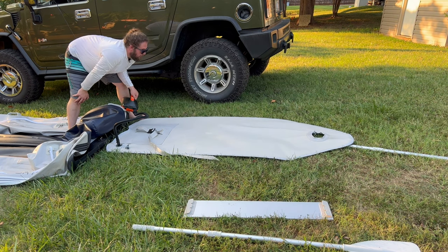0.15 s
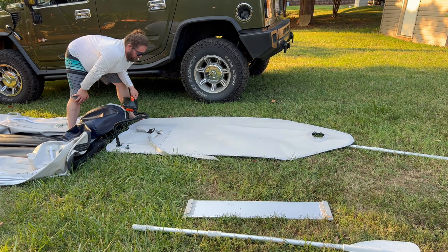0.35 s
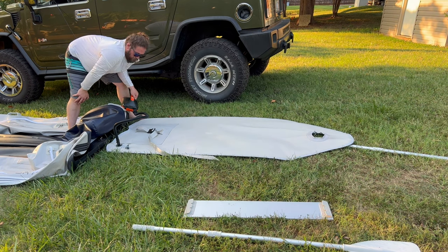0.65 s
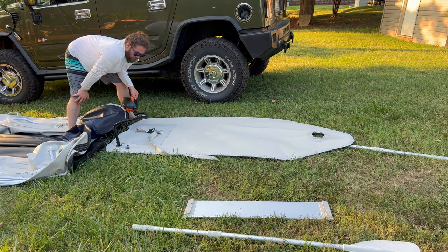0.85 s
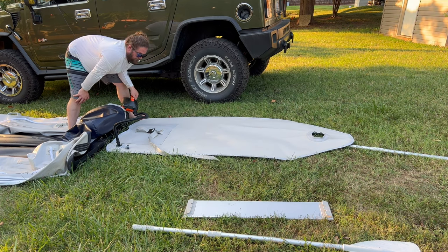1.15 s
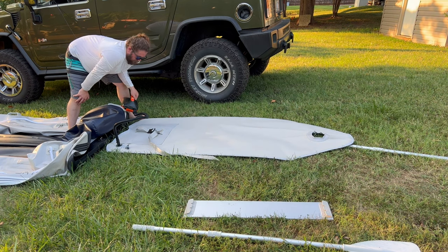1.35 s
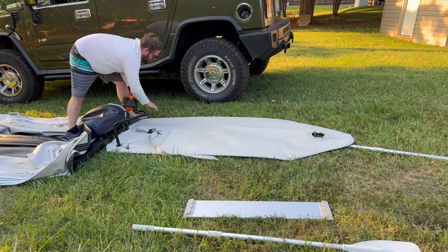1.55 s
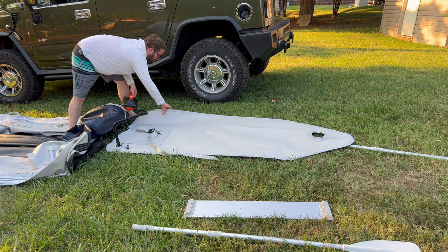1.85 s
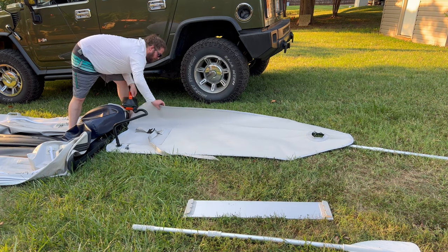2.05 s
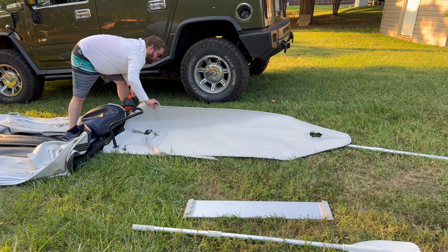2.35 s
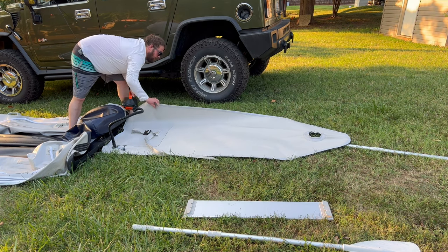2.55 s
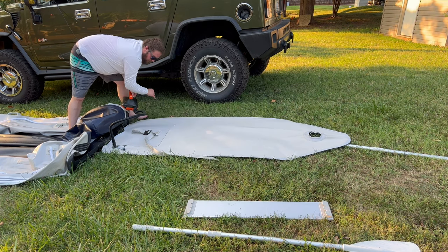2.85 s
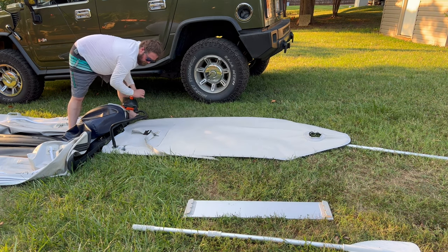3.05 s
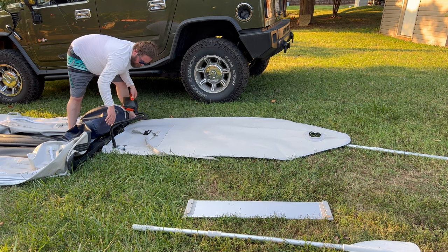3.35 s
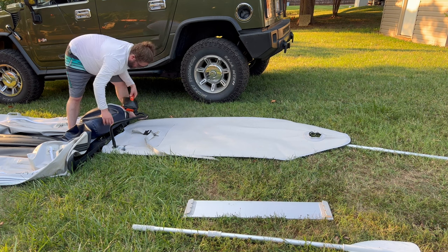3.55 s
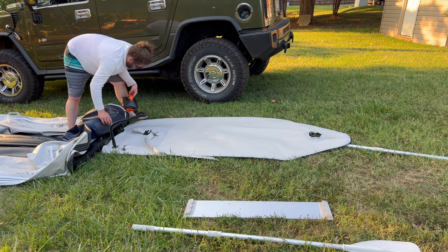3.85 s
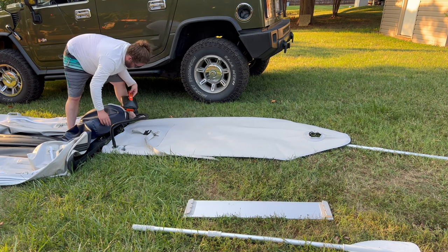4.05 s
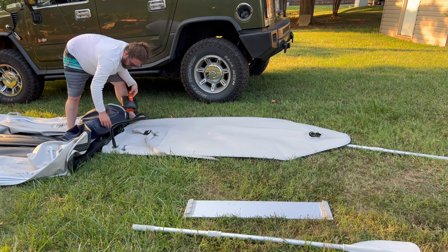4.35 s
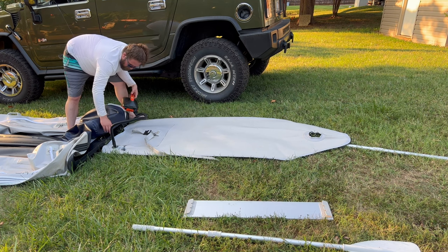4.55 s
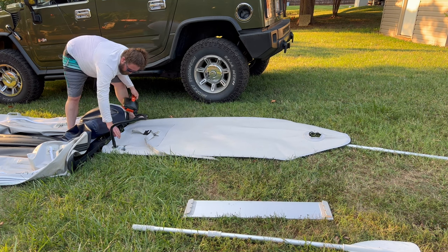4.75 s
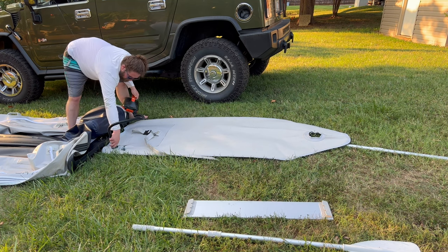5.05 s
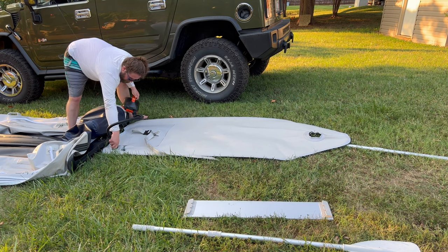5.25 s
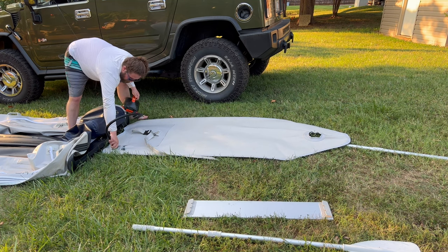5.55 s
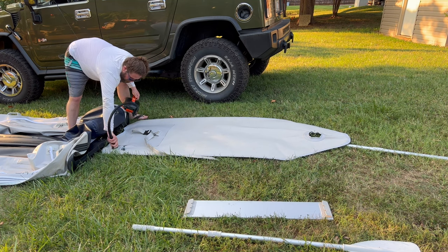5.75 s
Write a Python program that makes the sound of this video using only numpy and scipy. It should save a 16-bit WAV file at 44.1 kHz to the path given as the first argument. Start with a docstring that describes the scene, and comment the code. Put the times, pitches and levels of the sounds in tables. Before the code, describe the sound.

Steady mid-pitched pump whirr with breathy suction, a pop and brighter hiss, then a switch click and a falling, fading whine.

```python
"""On a lawn outdoors, a few metres away, a handheld electric air pump sucks the air out of an inflatable boat.
Its impeller hums at about 573 Hz, a sine with fluttering overtones, over a rush of air: shaped noise
that rings in the housing. The hose pops off the valve and is moved about, with knocks, a plop and soft bumps.
Then the switch clicks off and the rotor coasts down, its overtones sliding through the housing's resonances."""
import sys
import numpy as np
from scipy import signal
from scipy.io import wavfile

SR = 44100
rng = np.random.default_rng(int(sys.argv[2]) if len(sys.argv) > 2 else 0)


def transcribe(signal):
    """Save signal, clipped to [-1, 1], as a 16-bit WAV file at the path in sys.argv[1]."""
    frames = np.atleast_2d(signal).T
    limited = np.clip(frames, -1, 1)
    pcm = np.round(limited * 32767).astype(np.int16)
    wavfile.write(sys.argv[1], SR, pcm)


N = 260719
TIME = np.arange(N) / SR
RUN_HZ = 573  # pitch of the hum under power
OFF_S = 4.44  # the motor loses power
WHINE_MULTIPLE = 15  # the motor's high whine sits on this multiple of the hum


def from_db(db):
    """Decibels to gain."""
    return 10 ** (np.asarray(db) / 20)


def in_time(rows, at=TIME):
    """Each column of a curve at the given times."""
    seconds, *columns = np.transpose(rows)
    return [np.interp(at, seconds, column) for column in columns]


def at_hz(rows, hz):
    """Each column of a spectrum at the given frequencies, joined along log frequency."""
    points, *columns = np.transpose(rows)
    return [np.interp(np.log(hz), np.log(points), column) for column in columns]


def drift(rate_hz):
    """Slow chance with spread 1: noise through a two-pole low-pass, drawn at every 40th sample."""
    step, settle = 40, 2000
    pole = np.exp(-2 * np.pi * rate_hz * step / SR)
    draws = rng.standard_normal(N // step + settle + 2)
    slow = signal.lfilter([1], [1, -2 * pole, pole * pole], draws)[settle:]
    return np.interp(np.arange(N) / step, np.arange(len(slow)), slow / slow.std())


def shaped_noise(density_db, size=1024):
    """Noise whose level per Hz follows density_db(hz, s)."""
    frames = dict(fs=SR, nperseg=size, noverlap=size - size // 4)
    flat = rng.standard_normal(N) * np.sqrt(SR / 2)  # 0 dB per Hz
    hz, s, white = signal.stft(flat, **frames)
    gain = from_db(density_db(np.maximum(hz, 1)[:, None], s))
    return signal.istft(white * gain, **frames)[1][:N]


def in_state(values, s):
    """Blend one value per state of the pump; states left out count as zero."""
    # where pump and hose are: (time [s], state), with states
    # 0 hose on the valve, 1 hose open, 2 hose turned down, 3 coasting
    state_curve = [(0, 0), (1.81, 0), (1.82, 1), (2.75, 1), (3.05, 2), (4.5, 2), (5.4, 3), (5.91, 3)]
    state, = in_time(state_curve, s)
    return sum(value * np.maximum(0, 1 - abs(state - k)) for k, value in enumerate(values))


def rotor_hz(s):
    """Pitch of the hum: a little lower under load at first, then steady; after switch-off it coasts down."""
    load_sag_hz, load_eases_s = 4, (0.3, 0.55)
    # a small share of the speed goes at once, then drag slows the rotor exponentially
    drop_share, drop_s, drag_per_s = 0.016, 0.09, 0.65
    powered = RUN_HZ - np.interp(s, load_eases_s, [load_sag_hz, 0])
    coasted = np.maximum(s - OFF_S, 0)
    early_drop = drop_share * (1 - np.exp(-coasted / drop_s))
    return powered * np.exp(-drag_per_s * coasted - early_drop)


def rumble(early_db=-3.0, overall_db=0.5):
    """Steady low outdoor noise, a little stronger once the hose is off the valve."""
    # its colour before the trims above: (frequency [Hz], level [dB per Hz])
    rumble_colour = [(15, -80), (35, -75.5), (48, -81.5), (58, -71.5), (75, -83.5), (100, -81), (122, -79),
                     (150, -93), (300, -110)]

    def density_db(hz, s):
        return at_hz(rumble_colour, hz)[0] + overall_db + in_state([early_db], s)

    return shaped_noise(density_db, size=4096)


def soft_bumps(top_hz=50):
    """Soft low bumps: noise of 25 to 50 Hz under bell-shaped swells."""
    # each bump: (time [s], rms level at its height [dB], half length [s])
    bump_list = [(2.827, -47, 0.056), (4.274, -61, .02), (4.337, -47, 0.02), (5.23, -61, .03)]
    band = signal.butter(2, [top_hz / 2, top_hz], "band", fs=SR, output="sos")
    low = signal.sosfilt(band, rng.standard_normal(N))
    swells = sum(from_db(db) * np.exp(-((TIME - s) / length) ** 2) for s, db, length in bump_list)
    return swells * low / low.std()


def plops(cycles=0.61):
    """A puff of air at the hose end swings for little more than one cycle."""
    # soft plops of the hose end: (time [s], peak level [dB], frequency [Hz])
    plop_list = [(5.4836, -26.5, 302)]
    out = np.zeros(N)
    for s, db, hz in plop_list:
        age = TIME - s
        out += from_db(db) * np.exp(-(age * hz / cycles) ** 2) * np.cos(2 * np.pi * hz * age)
    return out


def knocks(crack_t60=0.011, crack_low_hz=6500, crack_high_hz=12000):
    """Plastic parts knock: a short decaying ring of the body under a bright crack of noise."""
    # hose, switch and handling: (time [s], starting level of the ring [dB], body pitch [Hz],
    # ring's fall by 60 dB [s], starting level of the crack before its band filter [dB])
    knock_list = [(1.819, -21, 1150, 0.0053, -42), (1.8203, -30, 240, 0.02, -60),
                  (1.821, -29.5, 3400, 0.0046, -45), (1.9753, -26, 290, 0.013, -23),
                  (4.259, -24, 1070, 0.0096, -40), (4.421, -21.5, 1030, 0.0087, -37),
                  (5.735, -52, 3500, .008, -36.5)]
    out = np.zeros(N)
    bright = signal.butter(2, [crack_low_hz, crack_high_hz], "band", fs=SR, output="sos")
    for s, level_db, hz, t60, crack_db in knock_list:
        age = np.maximum(TIME - s, 0)
        ring_gain = from_db(level_db - 60 * np.minimum(age / t60, 2))
        out += ring_gain * np.sin(2 * np.pi * hz * age)
        crack_gain = (age > 0) * from_db(crack_db - 60 * np.minimum(age / crack_t60, 2))
        out += signal.sosfilt(bright, crack_gain * rng.standard_normal(N))
    return out


def thin_hiss(centre_hz=5550, width_hz=380):
    """A narrow band of hiss with a smooth top, which shows as the pump dies away."""
    # level at the centre of the band: (time [s], level [dB per Hz])
    thin_level = [(0, -110), (3.6, -105), (4.7, -85), (5.3, -103), (5.6, -86.5), (5.91, -89)]

    def density_db(hz, s):
        band_db = -20 * np.log10(1 + ((hz - centre_hz) / width_hz) ** 2)
        return in_time(thin_level, s)[0] + band_db

    return shaped_noise(density_db)


def housing(hz, s):
    """Lift in dB that the resonances of housing and hose give to the air noise."""
    # (centre [Hz], half width [Hz], then lift on the valve, open, turned down, coasting [dB])
    resonances = [(2167, 340, 8, 7.5, 10.5, 14.5), (2400, 220, -2, 0, -1.5, -4.5),
                  (2487, 61, -12, -1, 0.5, 5), (3385, 220, 14, 8.5, 7, 8), (3625, 72, 4, -8, 0, 10.5),
                  (4220, 110, 7.5, -3, -4, 4), (4630, 310, 8.5, 2, 5, 6), (5090, 170, 5.5, -1, 5.5, 4),
                  (6070, 126, 9, 9.5, 11, 6), (6740, 280, 11, 6, 9.5, 14.5), (7460, 200, 1, 2.5, 0, 4),
                  (8670, 220, 2.5, 3.5, 0.5, 8), (10180, 180, 4, 1.5, 2.7, 6), (11500, 220, 0, 3, 0.5, 7),
                  (13100, 440, 4, 14.5, 13.5, 7)]
    return sum(in_state(dbs, s) * np.exp(-((hz - centre) / width) ** 2)
               for centre, width, *dbs in resonances)


def air_density(hz, s, swirl_multiple=2.638, swirl_width=0.16, whistle_hz=3390, whistle_width_hz=210,
                hiss_from_hz=3300, low_edge_hz=150, air_db=-0.87, gust_db=0.9):
    """Level per Hz of the turbulent air: coloured by the hose's state, ringing in the housing."""
    # base colour: (frequency [Hz], then on the valve, open, turned down, coasting [dB per Hz])
    air_colour = [(151, -83, -80, -81, -79.5), (272, -75.5, -74.5, -72, -74), (504, -81.5, -76.5, -78, -84),
                  (643, -77.5, -69, -76, -70.5), (1260, -78.5, -77.5, -75.5, -80),
                  (1600, -77, -76, -75.5, -88), (2580, -79.5, -79, -80, -89.5), (3870, -91, -73, -79, -87),
                  (4920, -97, -82.5, -85.5, -101), (7100, -86.5, -84, -77.5, -102.8),
                  (9360, -85.5, -79.5, -79.5, -89.5), (12300, -96.5, -87.5, -91.5, -102.7),
                  (14200, -103.7, -100, -101.5, -110.8)]
    # height of the hump of eddy noise, one per state: (level [dB])
    swirl_db = [8.8, 8.1, 9.2, 11.2]
    # low rush of air, added to the colour: (time [s], level [dB])
    rush_curve = [(0, -2), (1.6, -0.5), (1.85, 2.1), (3.5, 1.5), (3.85, 3), (4.7, -0.5), (4.9, 2.5),
                  (5.2, 0), (5.6, -4.2)]
    # rough whistle at the hose end, added to the colour: (time [s], level [dB])
    whistle_curve = [(0.6, 2), (2.0, -1), (2.25, 8), (2.5, 6), (2.9, -0.5), (3.42, -0.5), (3.55, -8.5),
                     (4.0, -1), (4.75, -3.5), (5.91, 0.5)]
    # hiss as the nozzle turns, added to the colour: (time [s], level [dB])
    hiss_curve = [(0.55, -1.5), (0.68, 3), (1.4, 2.5), (1.72, 5), (1.85, -2.5), (2.5, -3), (2.7, -3),
                  (2.9, -4.5), (3.35, -1), (3.8, -1.5), (4.18, -4.5), (4.3, -1), (4.75, 0.5), (5.4, -0.5),
                  (5.91, -6.5)]

    colour = in_state(at_hz(air_colour, hz), s) + housing(hz, s)
    # eddies carried round by the impeller make a broad hump that falls with its speed
    off_hump = (hz / rotor_hz(s) - swirl_multiple) / swirl_width
    swirl = in_state(swirl_db, s) * np.exp(-off_hump ** 2)
    # the flow is never quite even
    rush, whistle, hiss = [in_time(curve, s)[0] + gust_db * np.interp(s, TIME, drift(26))
                           for curve in (rush_curve, whistle_curve, hiss_curve)]
    low_share = 1 / (1 + (hz / hiss_from_hz) ** 4)
    swell = low_share * rush + (1 - low_share) * hiss
    # air across the open hose end sharpens one resonance into a rough whistle
    swell = swell + whistle / (1 + ((hz - whistle_hz) / whistle_width_hz) ** 2)
    low_cut = -10 * np.log10(1 + (low_edge_hz / hz) ** 6)
    return air_db + colour + swirl + swell + low_cut


def air_rush():
    """Turbulent air through pump and hose: noise shaped by the changing density."""
    return shaped_noise(air_density)


def running_levels(s, wander_db=2.5, low_share=0.35, high_share=0.17, harmonics_db=2.0, whine_db=0.5,
                   faint_db=-0.44):
    """Level in dB of each overtone under power; the faint ones depend on the hose's state and wander."""
    # harmonics before the lift harmonics_db: (time [s], level [dB])
    second = [(0.0, -49), (0.18, -57), (0.33, -50), (1.78, -54.5), (1.83, -47), (2.09, -52), (2.23, -37.5),
              (2.3, -48), (2.61, -43), (3.33, -54), (3.41, -41.5), (4.45, -57.5)]
    third = [(0.0, -57), (1.47, -53), (1.86, -46), (2.24, -45), (2.27, -58), (2.74, -44), (2.81, -50),
             (3.14, -44), (4.18, -59), (4.45, -60)]
    fourth = [(0.0, -58.5), (1.59, -48.5), (2.48, -56), (2.64, -50), (2.68, -55.5), (3.09, -46),
              (3.11, -54), (3.38, -38.5), (4.15, -54.5), (4.45, -55)]
    # the motor's high whine before the lift whine_db: (time [s], level [dB])
    whine_curve = [(0, -62), (0.95, -56), (1.4, -65), (2.15, -53.5), (2.35, -49), (2.68, -46.5),
                   (2.87, -56), (3.05, -43.5), (3.38, -40.5), (3.55, -54), (3.95, -59), (4.45, -55)]
    # fainter overtones, base level: {multiple of the hum: (on the valve, open, turned down [dB])}
    faint_partials = {5: (-54, -50, -53), 6: (-57, -54, -61), 7: (-66, -63, -65), 8: (-70, -64, -62),
                      9: (-63, -67, -59), 10: (-67, -64, -61), 11: (-62, -68, -59), 12: (-56, -68, -57),
                      13: (-67, -67, -62), 14: (-68, -67, -63), 18: (-62, -69, -64), 19: (-69, -73, -72),
                      20: (-66, -58, -55), 21: (-72, -76, -74), 25: (-77, -65, -65)}

    levels = {k: in_time(curve, s)[0] + harmonics_db for k, curve in enumerate([second, third, fourth], 2)}
    levels[WHINE_MULTIPLE] = in_time(whine_curve, s)[0] + whine_db
    for k, dbs in faint_partials.items():
        # overtones up to the ninth swell with the fourth harmonic, the higher ones with the whine
        leader, share = (levels[4], low_share) if k <= 9 else (levels[WHINE_MULTIPLE], high_share)
        swell = share * (leader - leader[s < OFF_S].mean())
        wander = wander_db * np.interp(s, TIME, drift(1.3))
        by_state = in_state((*dbs, dbs[-1]), s)  # coasting takes the turned-down level
        levels[k] = faint_db + by_state + swell + wander
    return levels


def flare(hz):
    """Lift in dB of a falling overtone as it crosses a resonance, flat on top and steep at the edges."""
    # (centre [Hz], half width [Hz], lift [dB])
    flare_bands = [(690, 26, 14), (795, 50, 16), (920, 60, 7), (1080, 70, 7), (1330, 70, 6), (1540, 45, 3),
                   (2220, 210, 10), (3400, 165, 24), (4480, 310, 14), (6220, 170, 13), (6900, 240, 15),
                   (7930, 250, 10), (8800, 270, 24)]
    return sum(lift / (1 + ((hz - centre) / width) ** 6) for centre, width, lift in flare_bands)


def coasting_levels(s):
    """Level in dB of each overtone as the rotor slows: it changes with speed and flares in the resonances."""
    # {multiple of the hum: (rms level at full speed between resonances [dB], loss per octave of slowing [dB])}
    coast_partials = {2: (-56, 2.4), 3: (-49, 15.7), 4: (-70, 4.5), 5: (-68, -9), 6: (-72, 6),
                      9: (-59, 11.3), 10: (-70, 7.4), 13: (-59, 30), 15: (-49, 35), 18: (-76, 12),
                      27: (-71, 7)}
    hz = rotor_hz(s)
    octaves_down = np.log2(RUN_HZ / hz)
    return {k: db - loss * octaves_down + flare(k * hz) for k, (db, loss) in coast_partials.items()}


def hum(phase, speed, off, waver=0.038, waver_hz=18):
    """The fundamental: it swells and fades under power, and weakens with its pitch as the rotor coasts."""
    # the running hum as pump and hose are moved: (time [s], rms level [dB])
    running_hum = [(0.0, -23), (0.04, -23.5), (0.14, -28.5), (0.2, -23.5), (0.62, -22), (0.8, -44),
                   (0.83, -31.5), (0.87, -25), (0.93, -22), (1.34, -22.5), (1.41, -21), (1.8, -20.5),
                   (1.85, -22.5), (2.09, -20.5), (2.16, -25), (2.23, -38), (2.29, -24.5), (2.43, -24),
                   (2.48, -26), (2.5, -41), (2.54, -22), (2.58, -22.5), (3.71, -19.5), (3.82, -20.5),
                   (3.88, -23.5), (4.14, -24), (4.2, -28.5), (4.34, -20.5), (4.41, -24), (4.45, -21)]
    # the housing radiates the coasting hum poorly as its pitch falls: (pitch [Hz], rms level [dB])
    hum_response = [(215, -64), (235, -49.5), (272, -53.5), (300, -41.5), (350, -34), (400, -23),
                    (418, -21.5), (450, -24), (520, -23.5), (560, -23)]
    level_db = (1 - off) * in_time(running_hum)[0] + off * at_hz(hum_response, speed)[0]
    return from_db(level_db) * (1 + waver * drift(waver_hz)) * np.sin(phase)


def impeller(jitter_hz=0.38, handover_s=0.092, flutter=0.3, flutter_hz=22):
    """Blade tones locked to one rotor; turbulence makes the overtones flutter."""
    speed = rotor_hz(TIME)
    phase = 2 * np.pi * np.cumsum(speed + jitter_hz * drift(6.77)) / SR
    off = np.clip((TIME - OFF_S) / handover_s, 0, 1)  # 0 under power, 1 coasting
    out = hum(phase, speed, off)
    s, gains = TIME[::200], {}
    for share, levels in ((1 - off, running_levels(s)), (off, coasting_levels(s))):
        for k, db in levels.items():
            gains[k] = gains.get(k, 0) + share * np.interp(TIME, s, from_db(db))
    for k, gain in gains.items():
        turn = k * phase + rng.uniform(0, 2 * np.pi)
        # chance on both sine and cosine ruffles level and phase alike
        tone = (1 + flutter * drift(flutter_hz)) * np.sin(turn)
        tone += flutter * drift(flutter_hz) * np.cos(turn)
        out += gain * tone / np.sqrt(1 + 2 * flutter ** 2)
    return np.sqrt(2) * out  # rms levels to sine peaks


def scene():
    """The pump in the open air, heard on one channel."""
    background = rumble() + soft_bumps()
    handling = plops() + knocks()
    pump = thin_hiss() + air_rush() + impeller()
    return (background + handling + pump)[None]


def record(dry, cutoff_hz=15500):
    """The microphone channel loses its top steeply, through an elliptic low-pass."""
    return signal.sosfilt(signal.ellip(12, .1, 90, cutoff_hz, fs=SR, output="sos"), dry)


dry = scene()
out = record(dry)
transcribe(out)
```